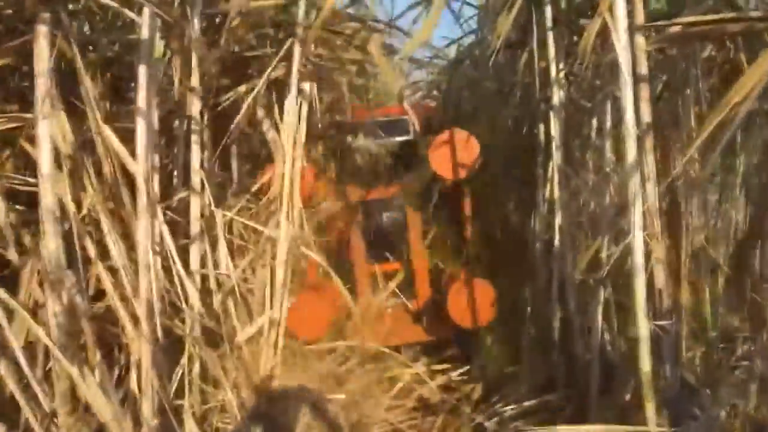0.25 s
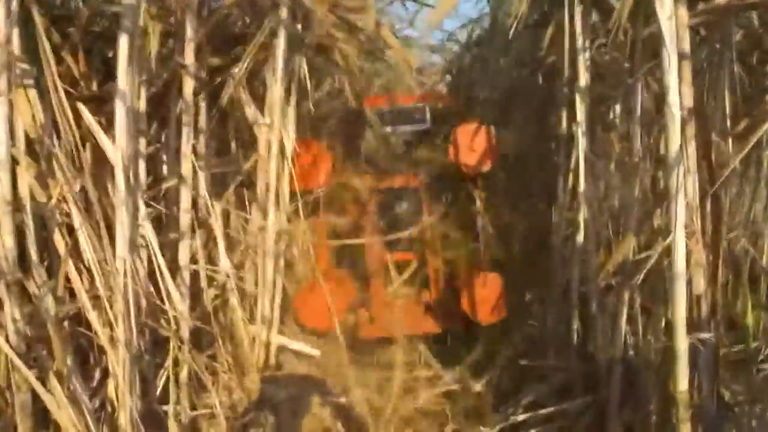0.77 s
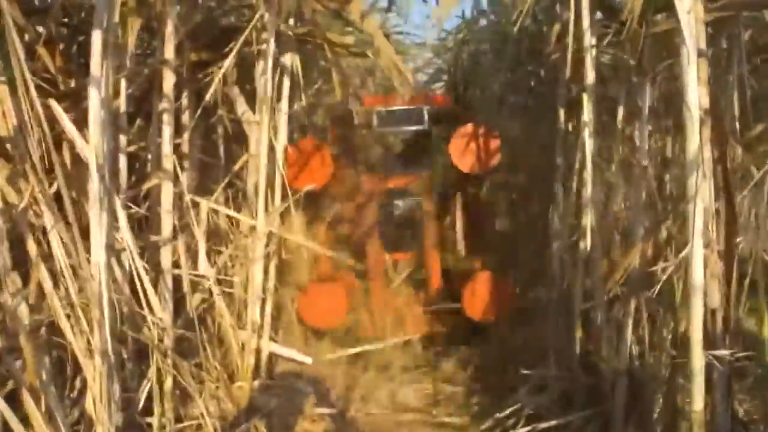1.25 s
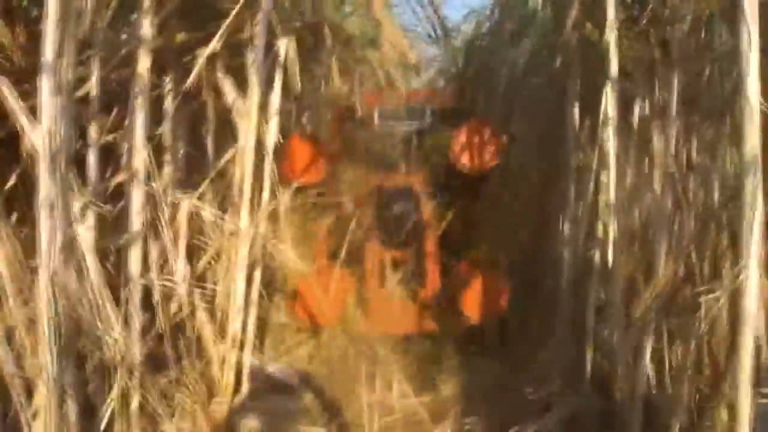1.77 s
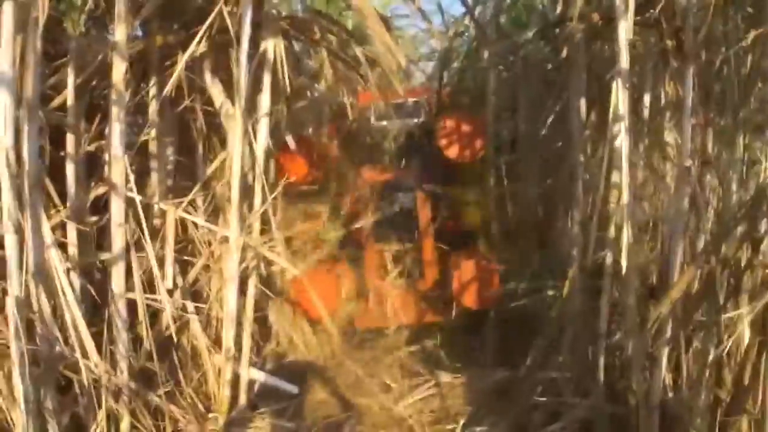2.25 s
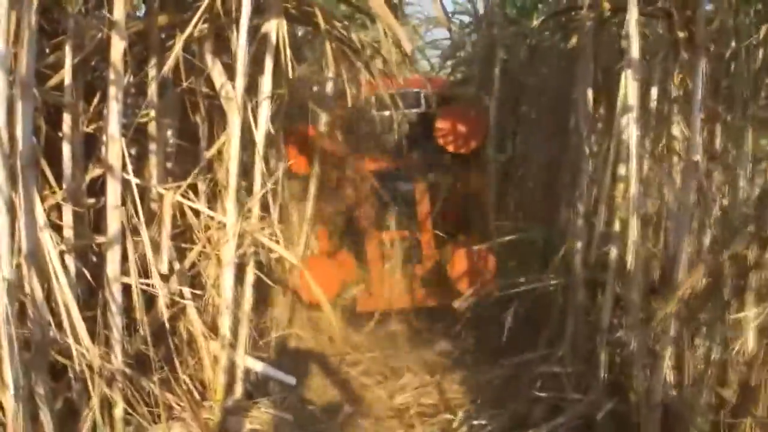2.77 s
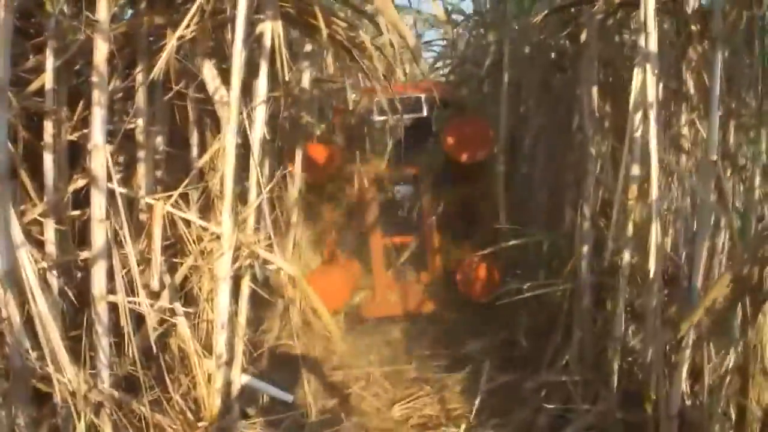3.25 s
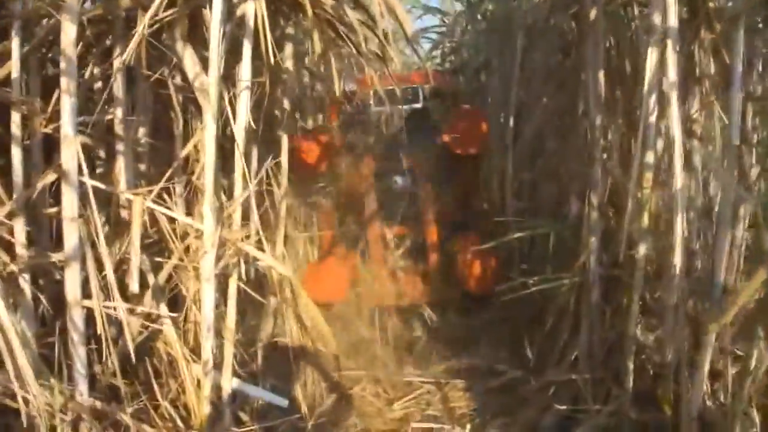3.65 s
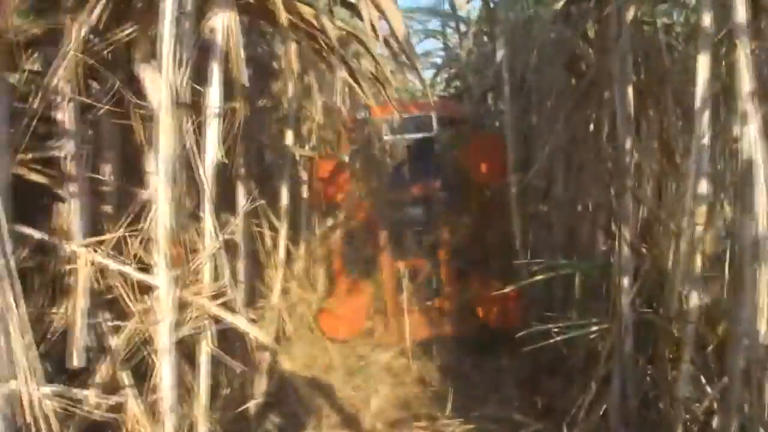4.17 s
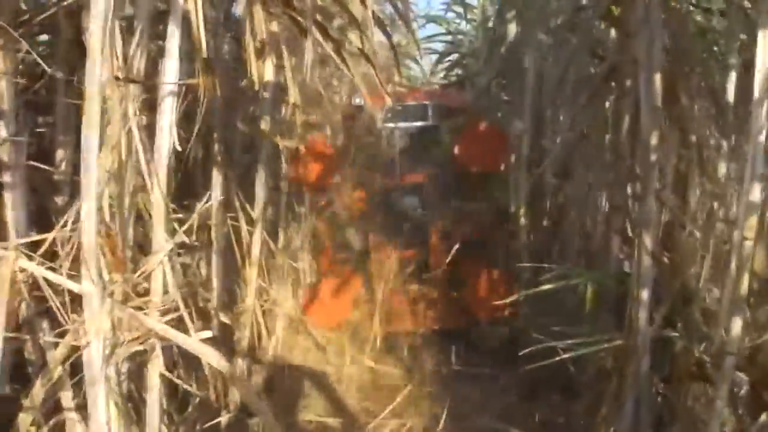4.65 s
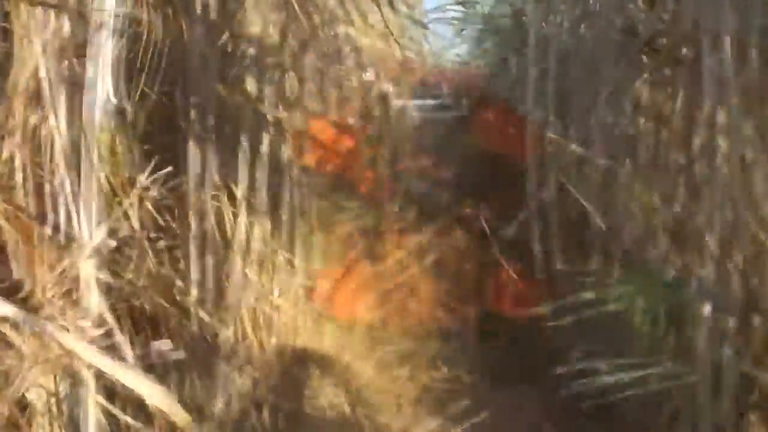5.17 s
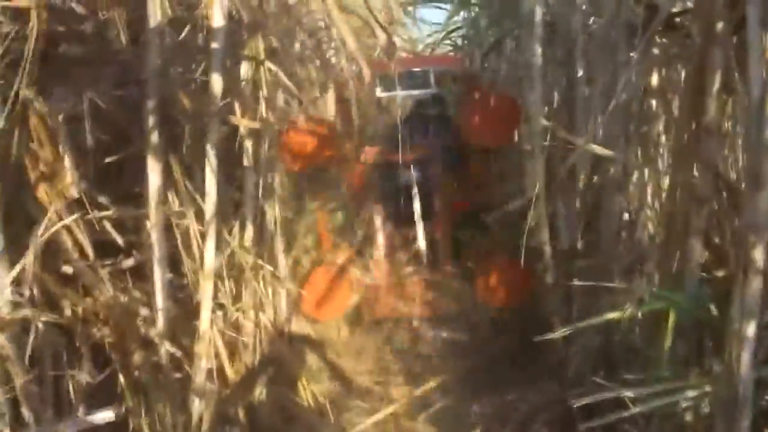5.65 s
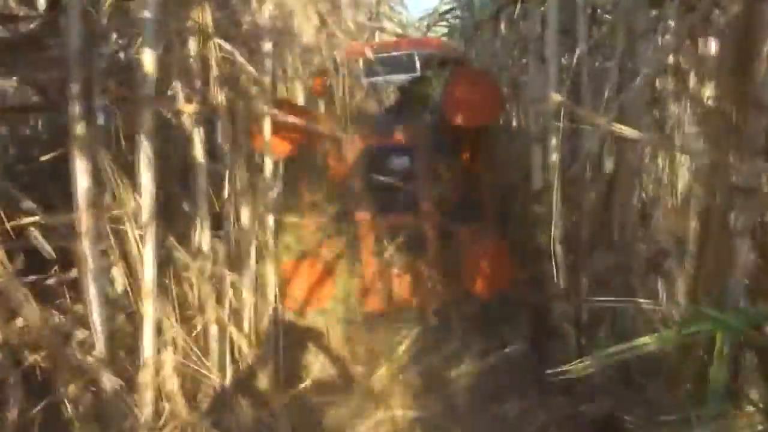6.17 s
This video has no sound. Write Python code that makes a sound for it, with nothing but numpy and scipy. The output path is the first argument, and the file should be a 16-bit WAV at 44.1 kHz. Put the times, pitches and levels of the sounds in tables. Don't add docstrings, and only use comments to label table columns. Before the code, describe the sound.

A small engine-driven cutter shreds tall dry cane outdoors, a dense bright crackle with sharp stalk pops and ticks over a rough low-mid roar.

```python
import sys
import numpy as np
from scipy import signal
from scipy.fft import rfft, irfft, next_fast_len
from scipy.io import wavfile
from scipy.ndimage import uniform_filter1d

SR = 44100
rng = np.random.default_rng(int(sys.argv[2]) if len(sys.argv) > 2 else 0)


def voltage_ratio(decibels):
    exponent = np.asarray(decibels, float) / 20
    return 10 ** exponent


def wav_out(sig):
    wavfile.write(sys.argv[1], SR, np.round(np.clip(np.atleast_2d(sig).T, -1, 1) * 32767).astype(np.int16))


N = 283122


def in_time(rows):
    s, *columns = np.transpose(rows)
    return [np.interp(np.arange(N) / SR, s, c) for c in columns]


def rms_one(x):
    return x / np.sqrt(np.mean(x ** 2) + 1e-20)


def coloured(x, spectrum):
    size = next_fast_len(N + 8192)
    hz, db = np.transpose(spectrum)
    bins_hz = np.arange(size // 2 + 1) * SR / size
    log_gain = np.log(voltage_ratio(np.interp(np.log(bins_hz + 1), np.log(hz), db)))
    cepstrum = irfft(log_gain, size)
    cepstrum[1:(size + 1) // 2] *= 2
    cepstrum[size // 2 + 1:] = 0
    return irfft(rfft(x, size) * np.exp(rfft(cepstrum)), size)[:N]


def drift(rate):
    r = np.exp(-20 * np.pi * rate / SR)
    slow = signal.lfilter([1], [1, -2 * r, r * r], rng.standard_normal(N // 10 + 5002))[5000:]
    return np.interp(np.arange(N) / 10, np.arange(len(slow)), rms_one(slow - slow.mean()))


def resonance(x, hz, width_hz):
    r = np.exp(-np.pi * width_hz / SR)
    feedback = [1, -2 * r * np.cos(2 * np.pi * hz / SR), r * r]
    return signal.lfilter([(1 - r * r) / 2, 0, (r * r - 1) / 2], feedback, x + 1e-18)


def swells(s, db, length_s):
    t = np.arange(0, N + 64, 64)
    bells = np.exp(-.5 * ((t / SR - np.c_[s]) / np.c_[length_s + 0 * s]) ** 2)
    return np.interp(np.arange(N), t, db @ bells)


# time in seconds, load in dB, leafiness in dB (more leaf than stalk).
FEED_LOAD = [(0, 1, -1), (.35, -0.5, -1.5), (.7, 1.5, .5), (1.0, -1, -0.5), (1.2, 1.5, 0), (1.37, 0, -1.5),
             (1.55, 1, -0.5), (2.0, -.5, 0), (2.45, 0, 1.5), (3.2, -1, .5), (3.55, -2, 1), (3.85, -2, 0.5),
             (4.15, 0, 0), (4.6, -.5, 0.5), (5.5, 0.35, -.5), (5.72, 1, -1), (6.1, 2, -3), (6.42, 2.5, -3)]


def feed():
    return in_time(FEED_LOAD)


# time in seconds, stalk change in dB, leaf change in dB.
CANE_BUNCHES = [(.01, 1, 2.5), (.13, 0, -3), (.18, 3, 4), (.26, 1.5, 3), (.32, 1, -1.5), (.37, 3.5, 4.5),
                (.53, 2.5, 0.5), (.71, 2.5, 0.5), (1.07, 1, 3), (1.23, 2, 3), (1.52, 1.5, 4),
                (2.2, 0, -3.5), (2.23, 3.5, 2.5), (2.43, 2.5, 0), (2.47, -0.5, -1), (3.02, 0.5, 2.5),
                (3.42, -2, -2), (3.79, 4.5, -0.5), (3.86, 6, -0.5), (3.93, 1.5, 3.5), (4.15, 1, 3.5),
                (4.26, -0.5, -1.5), (4.35, -1, 0.5), (5.56, -3, -4), (5.7, 4, 0), (5.92, -3, 2.5),
                (5.96, 2.5, 1.5), (6.11, 3.5, -1), (6.38, 1.5, 3.5)]


def bunches():
    s, stalk_db, leaf_db = np.transpose(CANE_BUNCHES)
    passing_s = 0.014
    return swells(s, stalk_db, passing_s), swells(s, leaf_db, passing_s)


def bites(per_s, decay_s):
    caught = rng.exponential(1, N) * (rng.random(N) < per_s / SR)
    swell = signal.lfilter([1], [1, -np.exp(-1 / (decay_s * SR))], caught)
    swell = np.log(swell + swell.mean())
    return rms_one(swell - uniform_filter1d(swell, size=3500))


def crackle(per_s, spread_db, cycles):
    sizes = voltage_ratio(spread_db * np.minimum(rng.exponential(1, N), 4.5)) * rng.choice([-1, 1], N)
    clicks = sizes * (rng.random(N) < per_s / SR)
    pitches = np.geomspace(1200, 15000, 14)
    dealt = rng.integers(0, 14, N)
    return rms_one(sum(resonance(clicks * (dealt == k), hz, hz / cycles) for k, hz in enumerate(pitches)))


# pitch in Hz, level in dB per Hz.
STALK_COLOUR = [(200, -39.5), (700, -26), (1480, -11.5), (2140, -3), (2480, 0), (3500, -4.5), (4500, -12.5),
                (7000, -21.5), (20000, -56)]
LEAF_COLOUR = [(500, -50), (2000, -13), (3500, -0.5), (4500, 0), (6000, -2.5), (7000, -4), (9000, -7),
               (20000, -55)]
CHAFF_COLOUR = [(500, -55), (4000, -21), (6000, -11.5), (7000, -4.5), (7910, -8), (9880, 3.5),
                (10400, -4.5), (11000, -11.5), (20000, -10)]
CRUNCH_DB, LEAVES_DB = -34, -34.5
DRUM_GEAR, DRUM_PHASE = 4, 1.5


def shredding(turns, crunch_db, leaves_db):
    drum = .75 * np.cos(2 * np.pi * turns / DRUM_GEAR + DRUM_PHASE)
    shared = drum + .7 * bites(120, decay_s=.005)
    kinds = [(crunch_db - .7, STALK_COLOUR), (leaves_db - 1.0, LEAF_COLOUR), (leaves_db - 2.5, CHAFF_COLOUR)]
    layers = 0
    for level_db, colour in kinds:
        bite_db = shared + 0.98 * bites(70, decay_s=0.0065)
        cracks = crackle(2500 * voltage_ratio(2.0 * bite_db), spread_db=3.5, cycles=1.37)
        noise = voltage_ratio(bite_db) * rng.standard_normal(N) + voltage_ratio(-4.0) * cracks
        layers = layers + voltage_ratio(level_db) * rms_one(coloured(noise, colour))
    return layers


# time in seconds, peak in dB, pitch in Hz.
HOLLOW_POPS = [(0.155, -15, 2480), (.1771, -14, 2680), (.2523, -15, 3000), (0.3522, -10, 2610),
               (.49, -17, 2760), (.5965, -13, 3440), (1.046, -15, 2970), (1.3075, -8, 3700),
               (1.7726, -18, 3060), (2.294, -16, 4600), (2.4922, -16, 2450), (3.1363, -12, 2980),
               (3.2482, -11, 4270), (4.155, -10, 4330), (4.357, -10, 2900), (4.568, -10, 3120),
               (4.619, -12, 2820), (4.6565, -14, 2980), (4.963, -12, 3240), (5.067, -9.5, 2660),
               (5.699, -14, 3000), (5.757, -14, 2360), (5.879, -11, 2670), (5.953, -18, 2470),
               (6.0734, -12.5, 3030), (6.0983, -14, 2860), (6.2484, -15, 3360), (6.266, -16, 2580),
               (6.307, -15, 3300), (6.36, -10, 3000)]
DRY_SPLITS = [(0.4336, -13.5, 2230), (.796, -15.5, 2820), (0.883, -14, 2560), (0.958, -16, 2540),
              (1.5742, -13.5, 2700), (1.7988, -14, 3570), (1.8617, -13, 4270), (2.0552, -13, 2810),
              (2.138, -14, 5030), (2.2382, -16.5, 2240), (2.33, -15.5, 2050), (2.466, -15, 2560),
              (2.603, -10.5, 2730), (2.786, -16, 2570), (2.823, -11, 2450), (3.0847, -13, 2360),
              (3.182, -15, 2510), (3.3337, -12, 5650), (3.391, -12.5, 3660), (3.4156, -15, 4450),
              (4.0777, -14.5, 2400), (4.0945, -14, 2860), (4.2294, -15.5, 4370), (4.269, -14, 4470),
              (4.3992, -11, 3520), (4.7088, -14.5, 2840), (4.777, -13.5, 4070), (4.9783, -15, 2800),
              (6.118, -18, 2480), (6.2103, -16, 3630)]
POP_SPLINTER_DB, SPLIT_SPLINTER_DB, TWIG_SPLINTER_DB = 5.1, 10, 7
AFTER_S, AFTER_DB, AFTER_OCTAVES = .006, -4, 0.24
TWIG_COUNT, TWIG_DB, TWIG_SPREAD_DB = 110, -21.5, 6.5
TWIG_LOW_HZ, TWIG_OCTAVES = 2050, 1


def breaks():
    rows = [(*row, POP_SPLINTER_DB) for row in HOLLOW_POPS]
    for s, db, hz in DRY_SPLITS:
        late, bend = rng.random(2)
        second_hz = hz * 2 ** (AFTER_OCTAVES * (2 * bend - 1))
        rows.append((s, db, hz, SPLIT_SPLINTER_DB))
        rows.append((s + AFTER_S * (.5 + late), db + AFTER_DB, second_hz, SPLIT_SPLINTER_DB))
    for when, size, pitch in rng.random((TWIG_COUNT, 3)):
        twig_db = TWIG_DB + TWIG_SPREAD_DB * (2 * size - 1)
        twig_hz = TWIG_LOW_HZ * 2 ** (TWIG_OCTAVES * pitch ** 2)
        rows.append((when * N / SR, twig_db, twig_hz, TWIG_SPLINTER_DB))
    return rows


def snaps():
    out = np.zeros(N + 900)
    t = np.arange(900) / SR
    giving = np.clip(t / .001, 0, 1) ** 2
    for s, db, hz, splinter_db in breaks():
        ring = np.sin(2 * np.pi * hz * t) * np.exp(-t * hz / 3.52)
        fading = 0.22 * np.exp(-t / 0.00072) + 0.12 * np.exp(-t / 0.007)
        splinter = rng.standard_normal(900) * fading
        out[round(s * SR):][:900] += voltage_ratio(db - 8.5) * giving * (ring + voltage_ratio(splinter_db) * splinter)
    return coloured(out[:N], [(300, -31.5), (1800, 6.0), (9800, 6.5), (10500, 0), (20000, 1)])


# time in seconds, peak in dB, direction of the push (+ or -).
BLADE_TICKS = [(0.2623, -13, -1), (0.368, -15.4, -1), (0.4916, -12.3, -1), (0.5239, -14.4, -1),
               (0.6095, -15.4, 1), (1.0594, -16, 1), (1.231, -11, 1), (1.3084, -15, -1), (1.574, -14.7, 1),
               (1.7541, -15.6, 1), (1.925, -13, -1), (2.1384, -11.5, -1), (2.1803, -15.2, 1),
               (2.2387, -18, 1), (2.3312, -15.7, -1), (2.4682, -11, -1), (3.0217, -12, -1),
               (3.085, -12, -1), (3.3356, -15.3, -1), (3.9379, -12, -1), (4.1097, -8, -1),
               (4.1565, -17, -1), (4.4021, -12.6, 1), (4.618, -16, 1), (4.7038, -18, -1),
               (5.0674, -14.4, -1), (5.6993, -15.3, -1), (6.1217, -17, -1), (6.2489, -15.6, -1),
               (6.3749, -17, 1)]
# pitch in Hz, level in dB.
BLADE_COLOUR = [(300, -21), (1200, -6), (2900, 0), (5500, 0), (8200, -9), (9600, -4), (11000, -12),
                (20000, -28)]
SMALL_TICKS_PER_S, SMALL_TICK_DB = 45, -25


def ticks():
    sizes = voltage_ratio(SMALL_TICK_DB + 3.0 * rng.standard_normal(N)) * rng.choice([-1, 1], N)
    clicks = sizes * (rng.random(N) < SMALL_TICKS_PER_S / SR)
    s, db, push = np.transpose(BLADE_TICKS)
    clicks[(s * SR).astype(int)] = voltage_ratio(db) * np.sign(push)
    return voltage_ratio(6) * coloured(clicks, BLADE_COLOUR)


# time in seconds, shaft turns per second.
SHAFT_SPEED = [
    (0, 46.7),
    (1.2, 46.9),
    (2.2, 47.5),
    (3.6, 48.6),
    (6.42, 48.7),
]


def shaft_turns():
    return np.cumsum(in_time(SHAFT_SPEED)[0]) / SR


# multiple of the shaft speed, level in dB rms.
HUM_ORDERS = [(1, -88), (2, -84), (3, -85), (4, -74), (5, -72.5), (6, -71.5), (12, -68)]
# pitch in Hz, level in dB per Hz.
ROAR_COLOUR = [(30, -42), (122, -35), (238, -22.5), (353, -19), (565, -8), (741, -11.5), (925, -7),
               (1150, -7), (1500, -8.5), (2200, -5), (4000, -26), (20000, -75)]
ROAR_DB, ROAR_FOLLOWS_LOAD, ROAR_FOLLOWS_LEAVES = -42.5, 0.62, 0.47


def engine(turns, load_db, leaves):
    hum = 0
    for k, db in HUM_ORDERS:
        wavering = voltage_ratio(db + 2.0 + 0.9 * drift(2.6))
        hum = hum + wavering * np.sin(2 * np.pi * k * turns + 1.16 * drift(3.7))
    roar_db = ROAR_DB + ROAR_FOLLOWS_LOAD * load_db + ROAR_FOLLOWS_LEAVES * leaves
    firing = voltage_ratio(0.5 * np.cos(np.pi * turns) + drift(30))
    return hum + voltage_ratio(roar_db + 2.5) * rms_one(coloured(firing * rng.standard_normal(N), ROAR_COLOUR))


# pitch in Hz, width in Hz, level in dB.
PANEL_MODES = [(825, 20, -6), (865, 60, -3), (912, 22, -1), (955, 20, 0), (1000, 18, -3), (1049, 18, -4),
               (585, 50, -9)]
# time in seconds, ring change in dB, length in seconds.
FRAME_JOLTS = [(0.063, 8, .04), (.18, -2, .015), (0.24, 18, 0.025), (.37, 0, .02), (0.538, 9, .03),
               (.66, -6, 0.019), (0.713, 14, 0.025), (.86, 2, .02), (1.07, 3, 0.018), (1.23, 4, 0.017),
               (1.487, 17, 0.011), (1.788, 8, 0.041), (2, 17, 0.068), (2.244, 3, 0.025), (2.362, 6, .04),
               (2.52, 4, 0.023), (2.87, 10, 0.024), (3, 10, 0.027), (3.2, 8.5, 0.12), (3.426, -18, .03),
               (3.808, -15, .02), (3.863, 16, 0.014), (4.237, 12, 0.02), (4.374, 11.5, .06),
               (5.496, 10, 0.082), (5.596, 11, 0.012), (5.723, 6, 0.043), (6.013, 15, 0.047),
               (6.14, 12, .04), (6.29, 17, 0.035)]
RING_DB, RING_FOLLOWS_LOAD = -49, 0.5


def panels(load_db):
    modes = 0
    for hz, width, db in PANEL_MODES:
        shaken = resonance(resonance(rng.standard_normal(N), hz, width), hz, 2 * width)
        modes = modes + voltage_ratio(db + 1.6 * drift(4.5)) * rms_one(shaken)
    ring_db = RING_DB + RING_FOLLOWS_LOAD * load_db + swells(*np.transpose(FRAME_JOLTS))
    return voltage_ratio(0.56 * ring_db - 20.5) * rms_one(modes)


# time in seconds, peak in dB, length in milliseconds, first push (+ or -).
CHIP_TAPS = [(0.9584, -42, 2.1, -1), (2.3309, -39, 1.8, -1), (2.604, -22, 0.96, 1), (3.0046, -51, 3, -1),
             (3.0203, -41, 2.2, -1), (3.2173, -47, 3.7, -1), (3.32, -39, 2.2, -1), (3.397, -38.5, 1.6, -1),
             (3.971, -39, 1.7, -1), (4.152, -47, 2.7, 1), (4.401, -41, 2.7, 1)]


def taps():
    out = np.zeros(N + 400)
    for s, db, ms, sign in CHIP_TAPS:
        phase = np.arange(400) / SR / (ms / 1000) - .75
        push = 3.14 * phase * np.exp(-(phase / 0.41) ** 4)
        out[round(s * SR) - 20:][:400] -= np.sign(sign) * voltage_ratio(db + 6.0) * push
    return signal.sosfilt(signal.butter(2, 110., "high", fs=SR, output="sos"), out[:N])


DUCK_ABOVE_DB, DUCK_SHARE, DUCK_RELEASE_S = -42.5, 0.12, 0.25


def ducking():
    t = np.arange(N) / SR - .006
    over_db = 0
    for s, db, *_ in CHIP_TAPS:
        recovery = (t > s) * np.exp(-np.maximum(t - s, 0) / DUCK_RELEASE_S)
        over_db = over_db + max(db - DUCK_ABOVE_DB, 0) * recovery
    return voltage_ratio(-DUCK_SHARE * uniform_filter1d(over_db, size=200))


def scene():
    turns = shaft_turns()
    load_db, leafy_db = feed()
    stalks, leaves = bunches()
    crunch_db = CRUNCH_DB + load_db + stalks
    leaves_db = LEAVES_DB + load_db + leafy_db + leaves
    machine = shredding(turns, crunch_db, leaves_db) + engine(turns, load_db, leaves) + panels(load_db)
    return ((machine + snaps() + ticks()) * ducking() + taps())[None]


def top_cut(x):
    return signal.sosfilt(signal.butter(12, 15500, fs=SR, output="sos"), x)


# pitch in Hz, level in dB.
COPY_COLOUR = [(9000, -95), (10950, -77), (11000, -29), (11700, -28), (13000, -23.5), (13800, -20.5),
               (14200, -24), (14450, -36), (15000, -80)]
BAND_EDGE_HZ, COPY_SHIFT_HZ, PATCHY_BELOW_HZ = 11000, 3960, 11720


def record(dry):
    spectrum = rfft(dry[0])
    hz = np.arange(N // 2 + 1) * SR / N
    shifted = irfft(np.roll(spectrum, round(COPY_SHIFT_HZ * N / SR)), N)
    copy = rfft(coloured(shifted, COPY_COLOUR))
    kept = np.clip(30 * (drift(9) + .55), 0, 1)
    patchy = kept * irfft(copy * (hz < PATCHY_BELOW_HZ), N) * voltage_ratio(3.5)
    steady = irfft(spectrum * (hz < BAND_EDGE_HZ) + copy * (hz >= PATCHY_BELOW_HZ), N)
    return top_cut((steady + patchy)[None])


dry = scene()
out = record(dry)
wav_out(out)
```